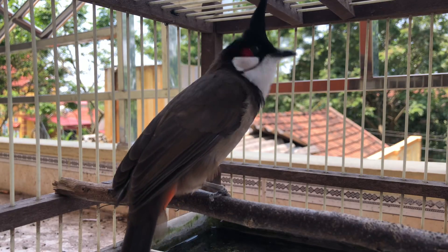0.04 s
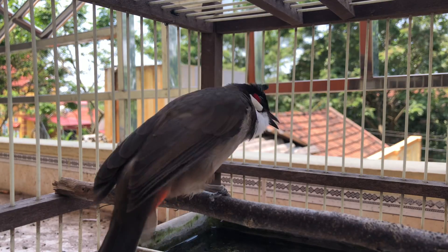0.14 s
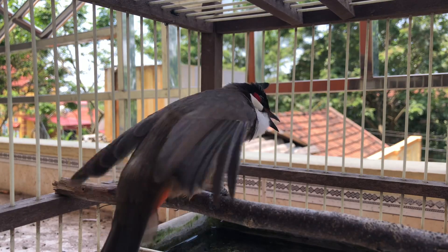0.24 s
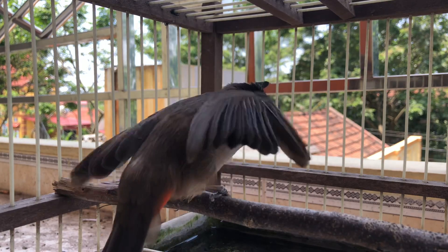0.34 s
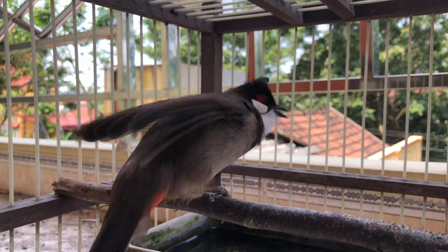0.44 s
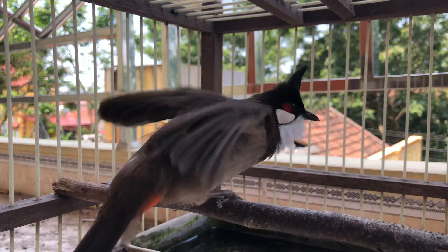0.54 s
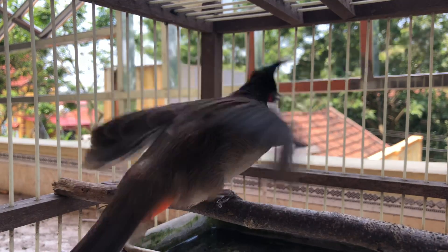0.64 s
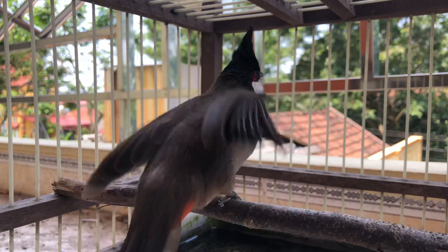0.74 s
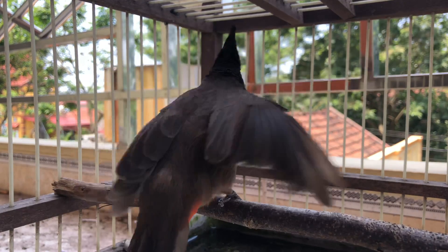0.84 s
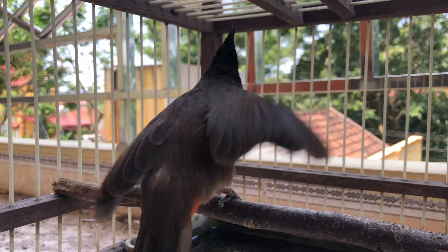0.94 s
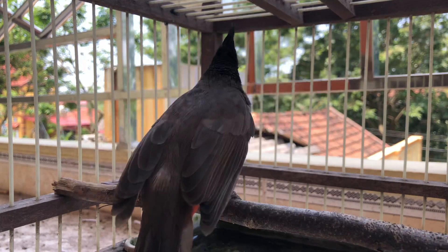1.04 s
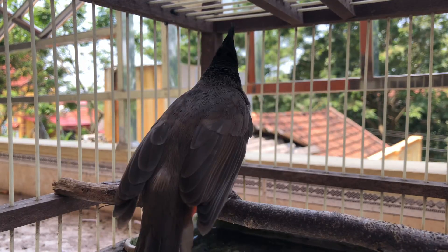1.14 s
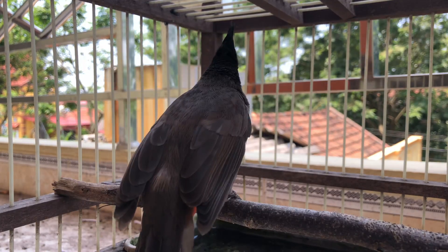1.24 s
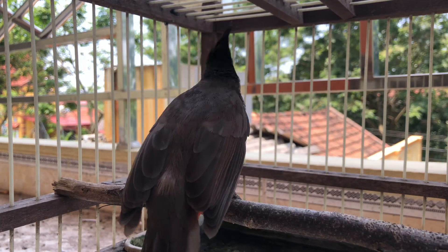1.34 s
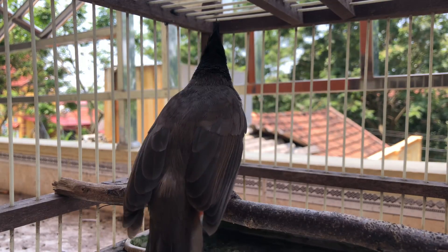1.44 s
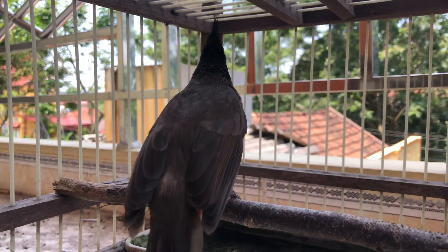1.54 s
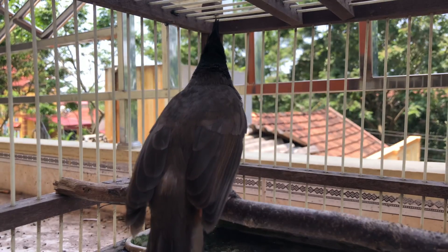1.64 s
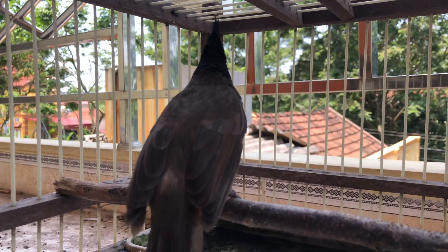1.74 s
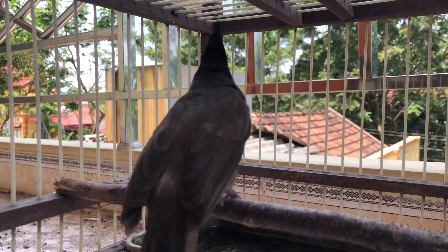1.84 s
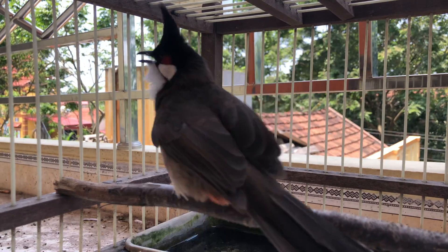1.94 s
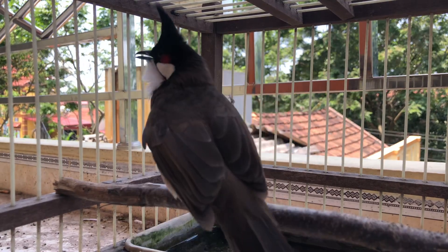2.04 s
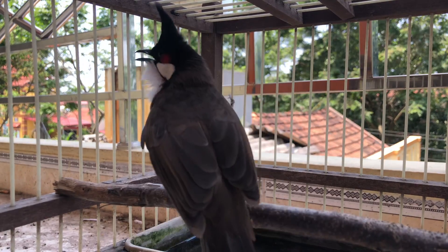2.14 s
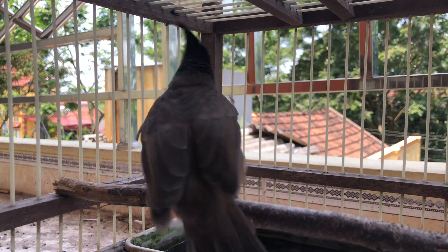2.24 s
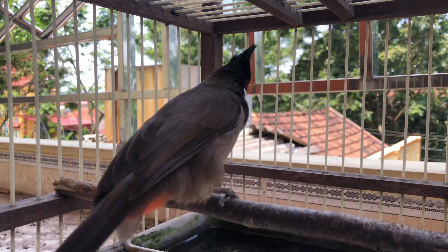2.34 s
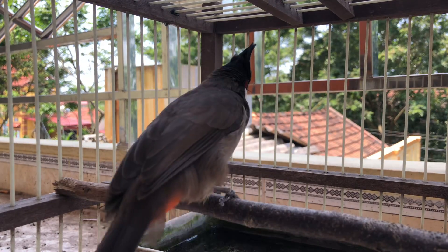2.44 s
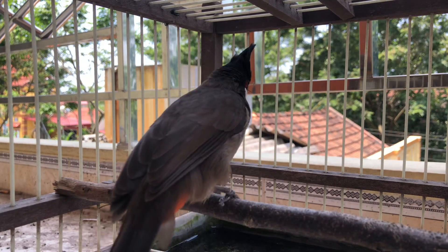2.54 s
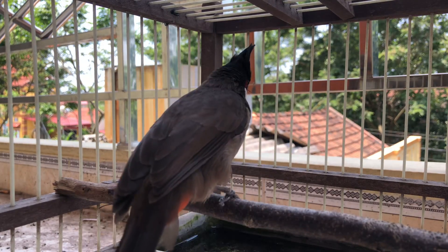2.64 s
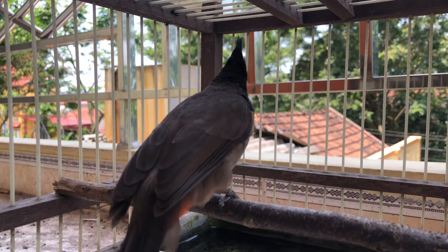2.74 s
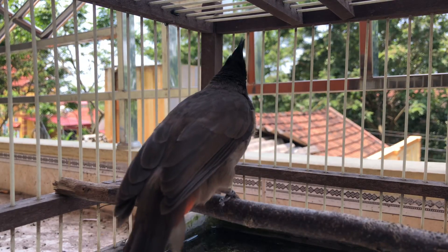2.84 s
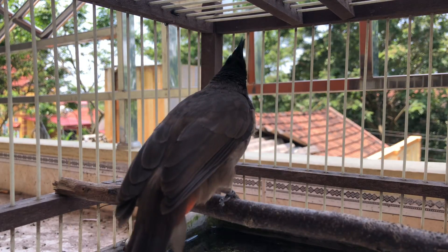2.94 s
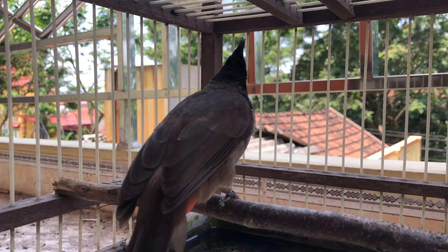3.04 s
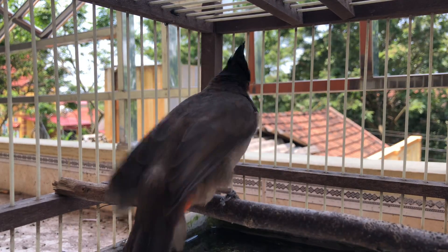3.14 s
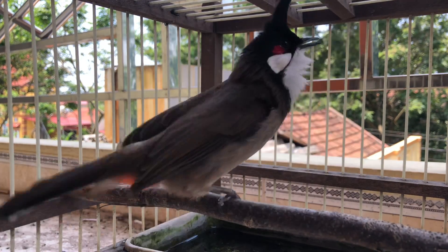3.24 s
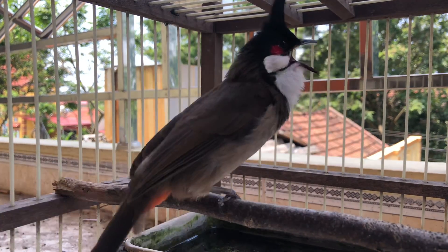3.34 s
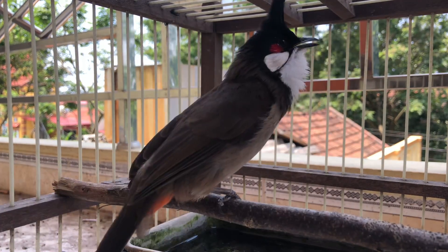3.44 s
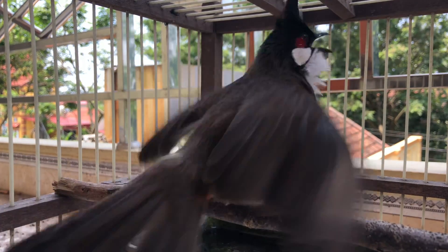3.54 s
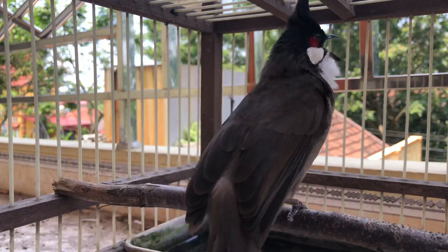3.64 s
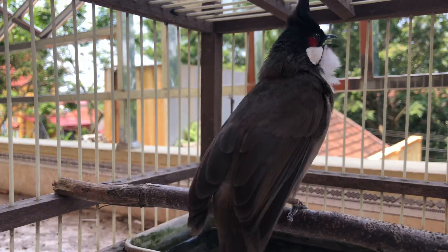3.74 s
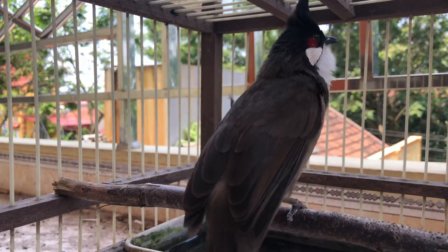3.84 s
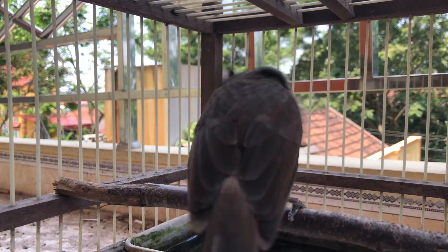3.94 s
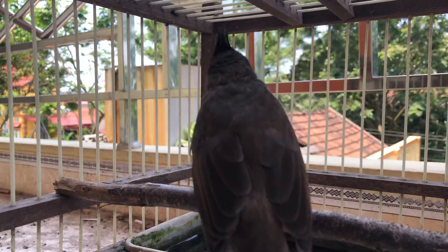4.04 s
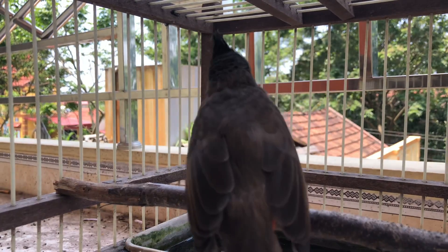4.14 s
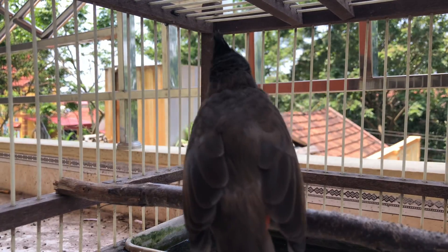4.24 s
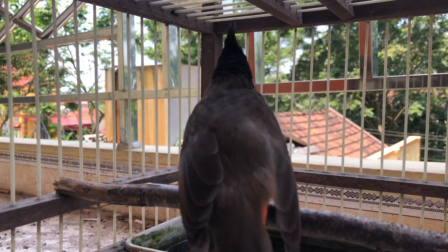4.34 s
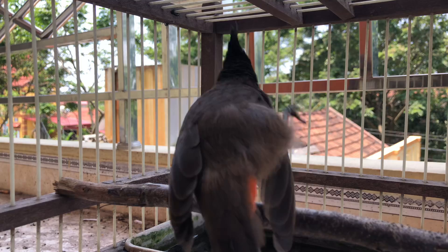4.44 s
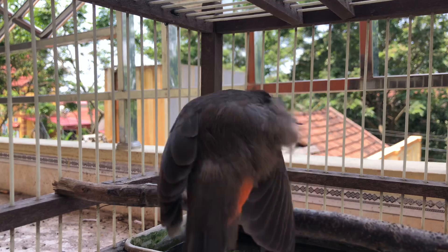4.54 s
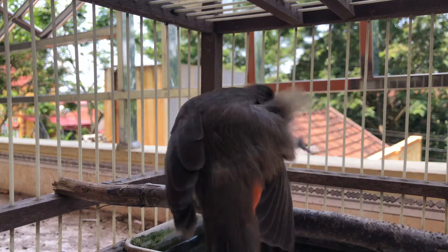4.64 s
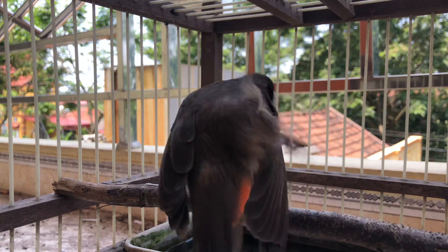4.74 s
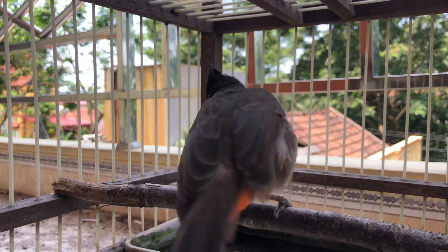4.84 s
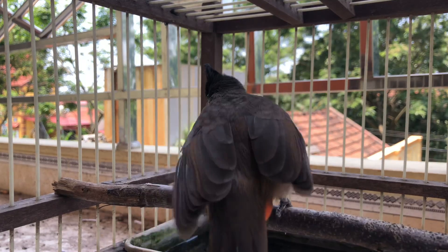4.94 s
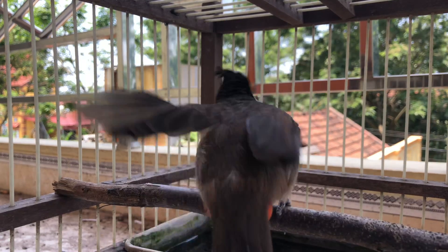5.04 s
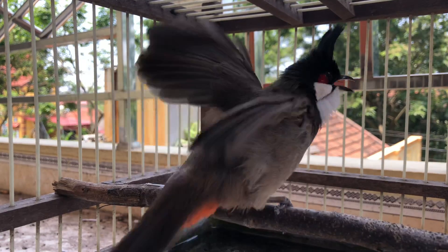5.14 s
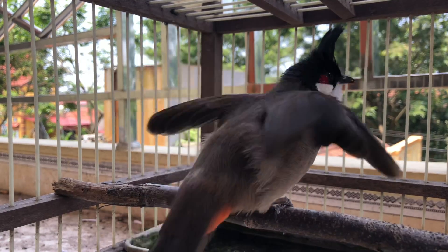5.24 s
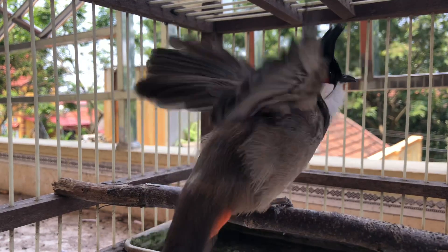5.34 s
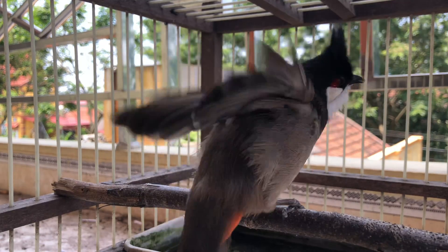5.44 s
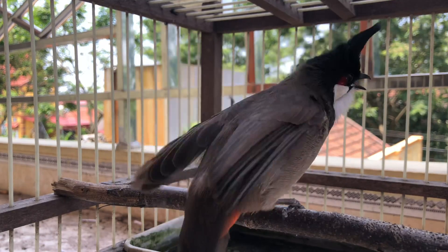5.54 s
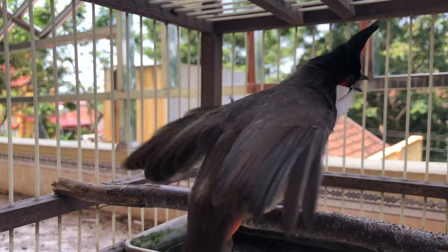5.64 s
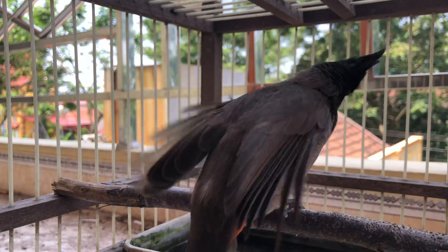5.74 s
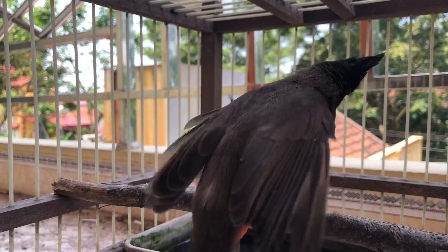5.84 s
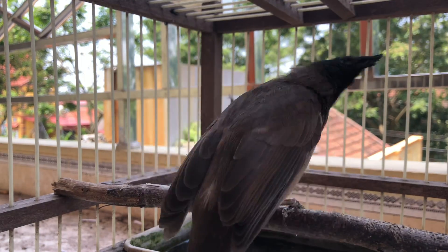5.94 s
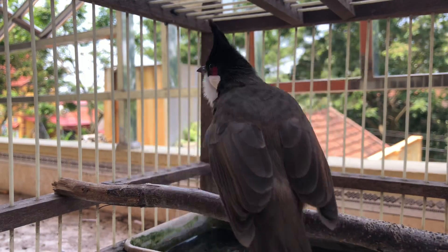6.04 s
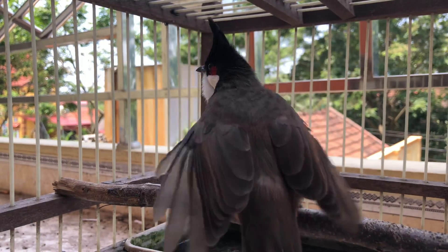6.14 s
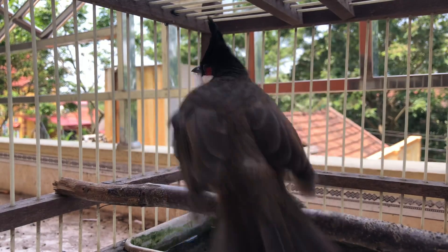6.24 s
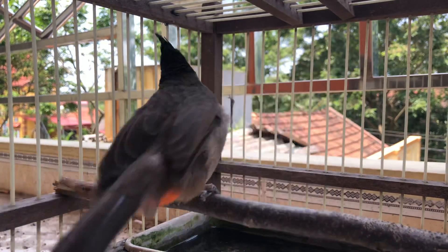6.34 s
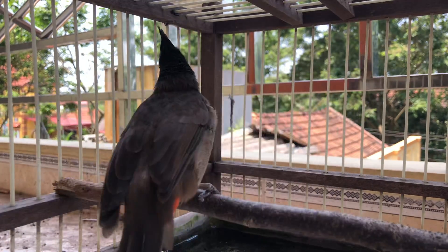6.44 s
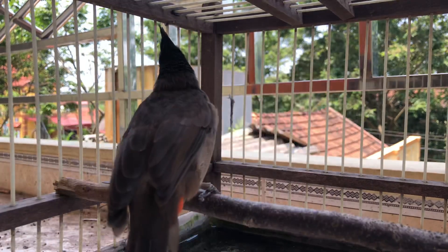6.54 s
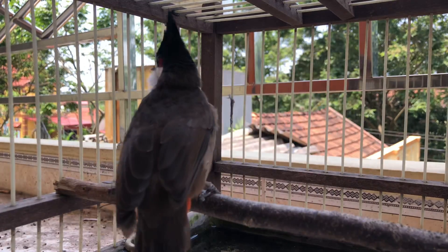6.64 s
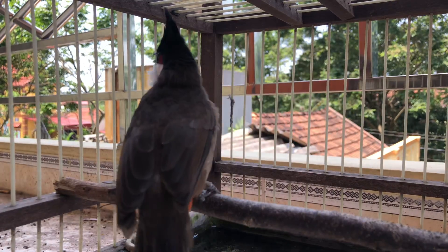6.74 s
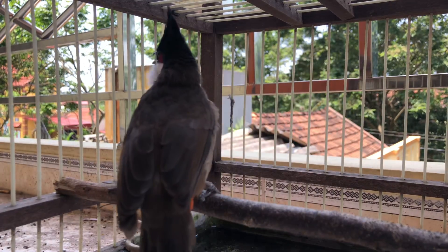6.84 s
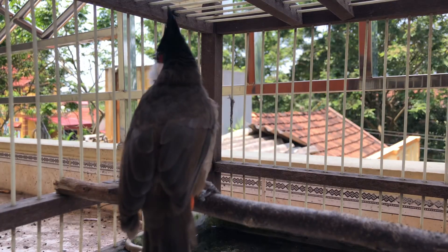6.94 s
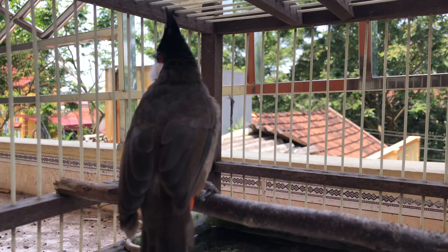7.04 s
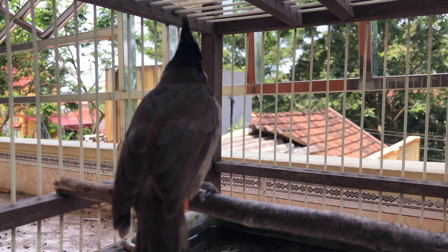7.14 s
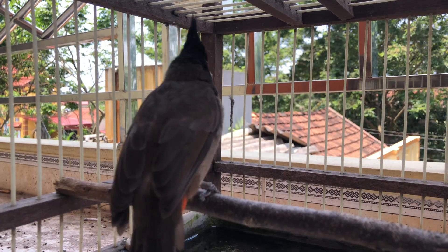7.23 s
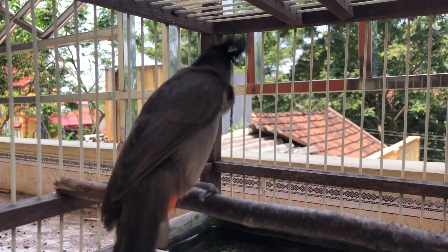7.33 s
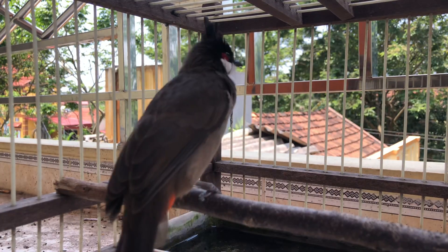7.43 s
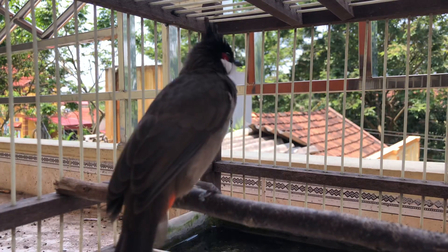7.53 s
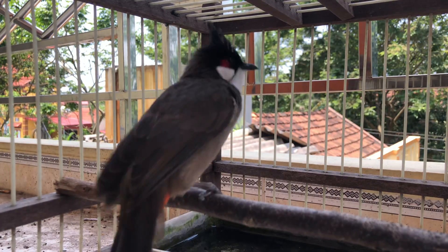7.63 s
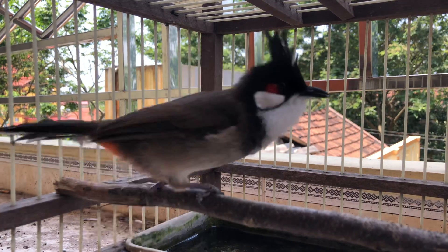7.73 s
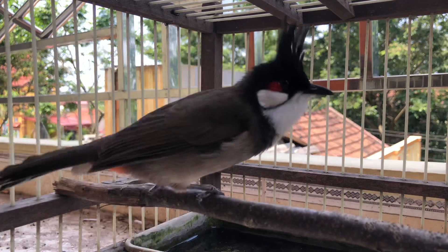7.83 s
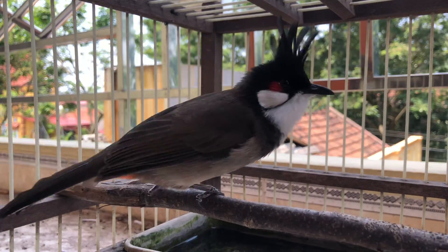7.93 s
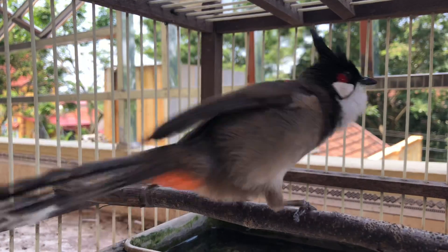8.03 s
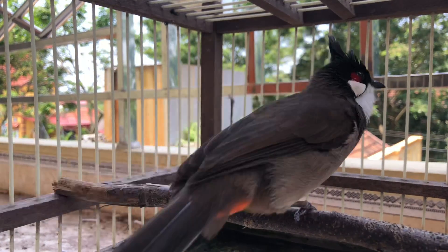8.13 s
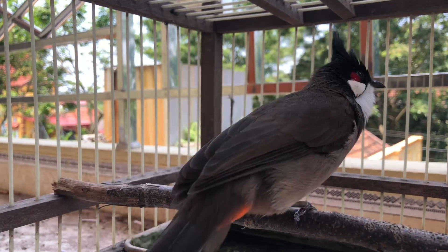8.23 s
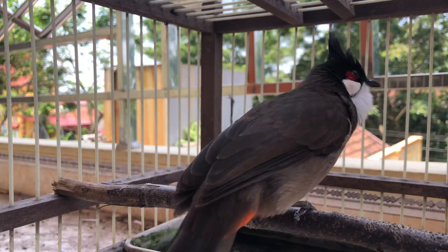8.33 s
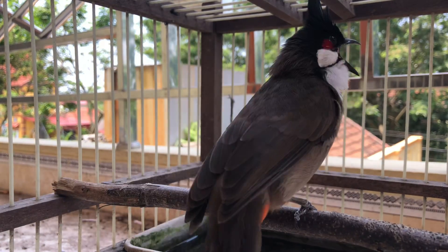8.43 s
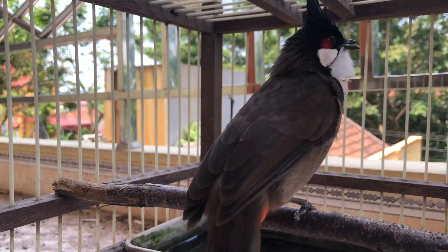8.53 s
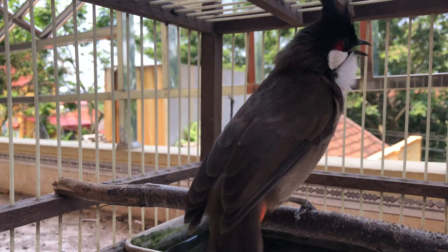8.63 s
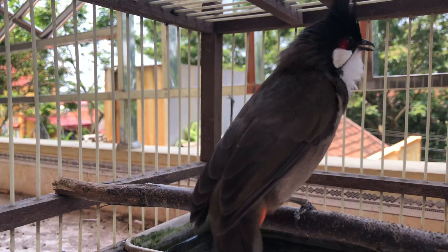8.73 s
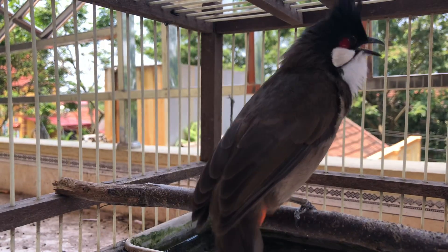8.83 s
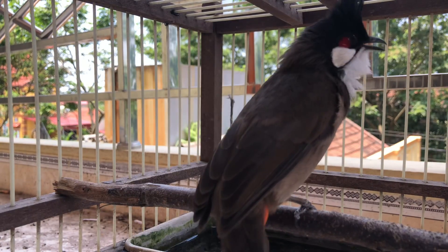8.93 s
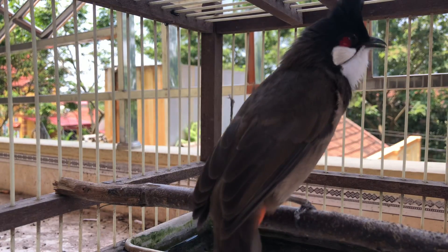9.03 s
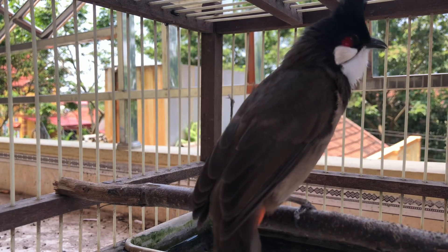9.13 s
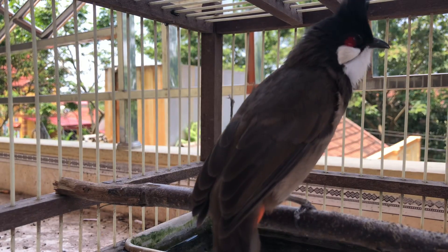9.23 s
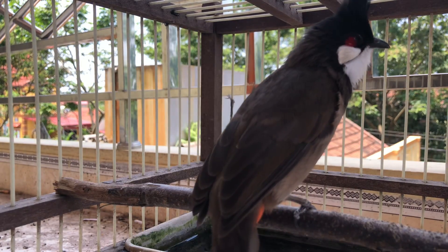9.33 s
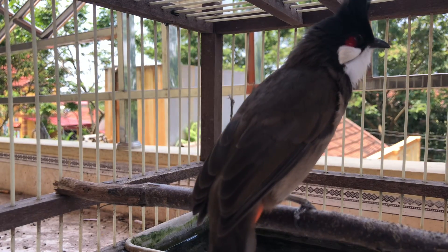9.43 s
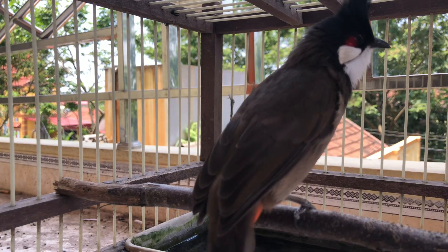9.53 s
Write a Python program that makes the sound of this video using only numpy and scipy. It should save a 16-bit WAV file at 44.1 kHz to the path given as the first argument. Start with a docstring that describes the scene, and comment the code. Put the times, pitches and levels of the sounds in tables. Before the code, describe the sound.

A caged songbird is very close to the microphone on a roofed terrace, its loud notes direct and bright with short wall reflections and a faint tail. Soft swooping and rising whistles open the first 0.7 s, then a low rattle and squeaky hook at 0.8. A quiet chip comes at 1.4, and a distant similar bird answers at 1.7. At 2.0-2.3 a loud buzz, raspy churr and clear pipe burst out. The main phrase, rising trill, stepped whistle, breaking leap, falling warble, rings at 3.3-3.8, 6.4-7.0 and 8.4-9.0. Between are soft raspy chips, feather puffs and a quieter scold, warble and swoop around 5.1-5.9. Another faint reply overlaps 6.3-6.6. Dull perch thuds cluster at 7.1-7.5. A thin flickering machine whine fades by 2.1; low hum, soft town rumble and faint far chirrs and hoots remain.

```python
"""Caged bulbul on a roofed terrace

A bulbul sings close to a phone: sine notes with trills, rough partials and breath, plus chips and noise-puff rustle.
Early copies and a long noise tail answer from the walls; a neighbour bird replies and far birds chirr and hoot faintly.
A machine whines and hums as gliding sines over patchy town noise, and the perch thuds as decaying wood modes.
The loudest notes push the recorder's limiter."""
import sys
import numpy as np
from scipy import signal
from scipy.fft import rfft, irfft, next_fast_len
from scipy.io import wavfile
from scipy.ndimage import uniform_filter1d, minimum_filter1d, map_coordinates

SR = 44100
rng = np.random.default_rng(int(sys.argv[2]) if len(sys.argv) > 2 else 0)


def volts_from_decibels(level):
    """Turn decibel levels (scalar or array-like) into linear amplitude factors."""
    exponent = np.asarray(level, float) / 20
    return 10 ** exponent


def unload_audio(sound):
    """Save the sound as a 16-bit wav file, at the path given as the first command line argument."""
    columns = np.transpose(np.atleast_2d(sound))
    # keep every value between -1 and 1, then stretch to whole-number steps
    steps = np.round(np.clip(columns, -1, 1) * 32767)
    wavfile.write(sys.argv[1], SR, steps.astype(np.int16))


N = 422478


def unit(x):
    """Scale to rms 1."""
    return x / np.sqrt(np.mean(x ** 2) + 1e-20)


def along(points, hz):
    """Read a (frequency, value) curve on a log frequency axis."""
    f, v = np.transpose(points)
    return np.interp(np.log(hz + 1), np.log(f + 1), v)


def wobble(count, rate_hz):
    """A smooth random curve through rate_hz random points a second."""
    points = rng.standard_normal(int(count * rate_hz / SR) + 4)
    return map_coordinates(points, [np.arange(count) * rate_hz / SR])


def coloured(x, points):
    """Equalise x with a (frequency [Hz], gain [dB]) curve."""
    m = next_fast_len(len(x) + 8192)
    gain = volts_from_decibels(along(points, np.fft.rfftfreq(m, 1 / SR)))
    return irfft(rfft(x, m) * gain, m)[:len(x)]


def add(track, s, sound):
    """Mix a sound in at time s."""
    part = track[round(s * SR):][:len(sound)]
    part += sound[:len(part)]


# overall tilt of the town noise: (frequency [Hz], relative level [dB])
TOWN_COLOUR = [(12, -35), (20, 2), (107, -0.5), (554, -20), (1180, -22.5), (1690, -16), (2060, -26),
               (2720, -20.5), (4250, -30.5), (5030, -30), (8080, -39.5), (10800, -46), (12600, -51.5),
               (15800, -46)]
# rumble swell, used relative to its mean: (time [s], level [dB])
RUMBLE_SWELL = [(0.0, -56), (0.4, -60.5), (1.15, -57.5), (2.11, -58), (3.07, -55), (3.28, -61),
                (5.12, -57.5), (8.3, -57.5), (8.7, -61), (9.58, -62)]
# treble hiss swell: (time [s], relative level [dB])
HISS_SWELL = [(0, 5.5), (1.2, 4.5), (2.7, 0), (4.5, 6), (6., 2), (7.5, 3.5), (9.58, -7.5)]


def town():
    """Patchy noise from a random time-frequency field; rumble and hiss swell on their own, the middle stays."""
    hz, t, z = signal.stft(rng.standard_normal(N), SR, nperseg=1024)
    patches = rng.standard_normal(z.shape)
    patches = unit(uniform_filter1d(uniform_filter1d(patches, 5, 0), 6, 1))
    s, rumble_db = np.transpose(RUMBLE_SWELL)
    low = np.clip(2 - hz / 400, 0, 1)[:, None]
    high = np.clip(hz / 2500 - 1.5, 0, 1)[:, None]
    gusts = 1.2 * wobble(N, rate_hz=3)[np.minimum(np.round(t * SR).astype(int), N - 1)]
    rumble = np.interp(t, s, rumble_db - rumble_db.mean()) + gusts
    swell = low * rumble + high * np.interp(t, *np.transpose(HISS_SWELL))
    noise = signal.istft(z * volts_from_decibels(0.88 * patches + swell), SR, nperseg=1024)[1][:N]
    return volts_from_decibels(-52.5) * unit(coloured(noise, TOWN_COLOUR))


# machine whine before its flicker: (time [s], pitch [Hz], rms level [dB], octave rms level [dB])
WHINE_GLIDE = [(0, 721, -63, -60.5), (.24, 729, -59, -72), (0.301, 746, -58.5, -55.5),
               (.55, 719, -45.5, -54.5), (.66, 708, -61, -58), (.85, 729, -59.5, -63), (.92, 732, -61, -47),
               (2.07, 729, -72, -51.5), (2.15, 744, -91, -66.5)]


def whine():
    """A gliding machine tone and its octave, each flickering in level on its own."""
    s, hz, db, octave_db = np.transpose(WHINE_GLIDE)
    t = np.arange(0, s[-1], 1 / SR)
    phase = 2 * np.pi * np.cumsum(np.interp(t, s, hz)) / SR
    low = volts_from_decibels(np.interp(t, s, db) + 2.5 * wobble(len(t), rate_hz=18)) * np.sin(phase)
    high = volts_from_decibels(np.interp(t, s, octave_db) + 2.6 * wobble(len(t), rate_hz=36)) * np.sin(2 * phase)
    return np.sqrt(2) * np.pad(low + high, (0, N - len(t)))


# low hum: (centre pitch [Hz], centre rms level [dB], level waver [dB])
HUM_TONE = (100.5, -62, 4)


def hum():
    """A low sine that wavers in level and pitch."""
    hz, db, waver_db = HUM_TONE
    phase = 2 * np.pi * np.cumsum(hz * (1 + 0.018 * wobble(N, rate_hz=14))) / SR
    return np.sqrt(2) * volts_from_decibels(db + waver_db * wobble(N, rate_hz=4)) * np.sin(phase)


# faint far hoots: (time [s], length [s], centre pitch [Hz], level before waver [dB])
FAR_HOOTS = [(0.038, 0.074, 903, -49.5), (4.94, 0.11, 516, -59), (5.797, 0.22, 962, -60.5),
             (5.81, 0.16, 619, -62), (6.438, 0.13, 946, -61), (8.999, 0.13, 623, -63.5),
             (9.274, 0.27, 644.6, -53.5)]


def hoots():
    """Soft far-off sines with an octave, wavering in pitch and level."""
    out = np.zeros(N)
    for s, length, hz, db in FAR_HOOTS:
        count = round(length * SR)
        phase = 2 * np.pi * np.cumsum(hz * (1 + .01 * wobble(count, rate_hz=15))) / SR
        level = volts_from_decibels(db + 2.8 * wobble(count, rate_hz=41)) * np.hanning(count) ** .5
        add(out, s, level * (np.sin(phase) + .5 * np.sin(2 * phase)))
    return out


# the throat passes only overtones that lie low: (overtone frequency [Hz], relative level [dB])
THROAT = [(2000, 6.5), (2800, -11), (3300, -16.5), (3800, -26), (4600, -31.5), (6000, -32), (8000, -36.5)]
# weak rough partials: (multiple of the pitch, level before effort and flutter [dB])
ROUGH_PARTIALS = [(.5, -50.5), (1.5, -54.5), (2.5, -53.5), (3, -44.5), (3.5, -57.5), (4, -52.5), (4.5, -52),
                  (5, -39), (5.5, -55.5), (6, -36)]
# air hissing through the beak: (frequency [Hz], relative level [dB])
BEAK_AIR = [(500, -39), (2500, -1.5), (7000, 0.5), (9000, -4.5), (11000, 0.5), (14000, -1)]
# the voice's treble, which changes as the head turns: (time [s], gain [dB])
HEAD_TURN = [(.6, -1), (2, -2), (3.3, 2.5), (3.7, -1.5), (5.2, 0), (6.4, -1), (6.8, -3), (8.4, 3.5),
             (8.9, 0.5)]


def syrinx(rows, trill=(190, .1, 0, 0), close_db=-32., throat_db=0., slope_db=6.5,
           uneven=.06, rasp_db=-21.0, breath_db=-44.0):
    """One note: a sine with weak rough partials; the membrane slackens at the end and the pitch drops away.

    trill = (swings a second [Hz], pitch swing, double-beat share at start, at end; shares clip to 0-1)."""
    rows = np.array(rows, float)
    s, hz, db = rows.T[:3]
    end, faint = s[-1], min(db[-1], db.max() + close_db)
    t = np.arange(s[0] - .003, end + .012, 1 / SR)
    knots = np.r_[t[0], s, end + .002, end + .008, end + .012]
    pitch = np.interp(t, knots, np.r_[hz[0], hz, .8 * hz[-1], 1050, 850])
    pitch = uniform_filter1d(pitch, size=50)
    level_db = np.interp(t, knots, np.r_[db[0] - 20, db, faint, faint - 5, faint - 24])
    level = volts_from_decibels(uniform_filter1d(level_db, size=50))
    depth = np.interp(t, s, np.clip(rows[:, 3], 0, 1)) if rows.shape[1] > 3 else 0 * t
    # the trill swings the pitch unevenly; loudness beats once or twice a swing
    trill_hz, swing, *twice = trill
    twice = np.clip(np.interp(t, s[[0, -1]], twice), 0, 1)
    swings = np.cumsum(trill_hz * (1 + uneven * wobble(len(t), rate_hz=60))) / SR
    beat = 2 * np.pi * (swings + rng.random())
    level = level * (1 + depth * ((1 - twice) * np.cos(beat + 2.0) + twice * np.cos(2 * beat + 1.8)))
    level = level * (1 + depth * volts_from_decibels(rasp_db) * wobble(len(t), rate_hz=1500))
    jitter = 0.0085 * wobble(len(t), rate_hz=310)
    phase = 2 * np.pi * np.cumsum(pitch * (1 + swing * depth * np.cos(beat) + jitter)) / SR
    tone = np.sin(phase)
    for k in range(2, 5):
        overtone_db = along(THROAT, k * pitch) + throat_db - slope_db * (k - 2.5)
        tone += volts_from_decibels(overtone_db) * np.sin(k * phase)
    # harder singing brings out the treble
    effort = np.clip(level / .35, 0, 1) ** .8 * volts_from_decibels(np.interp(s[0], *np.transpose(HEAD_TURN)))
    for k, part_db in ROUGH_PARTIALS:
        flutter = 1.3 + (.5 + 0.55 * depth) * wobble(len(t), rate_hz=470)
        tone += volts_from_decibels(part_db) * effort * flutter * np.sin(k * phase) * (k * pitch < SR / 2)
    breath = coloured(rng.standard_normal(len(t)), BEAK_AIR)
    tone += volts_from_decibels(breath_db + 9 * depth) * effort * breath
    return t[0], np.sqrt(2) * level * tone


def sing(track, shape, s=0, db=0, factor=1, stretch=1, depth=1, **voice):
    """One syllable at time s, scaled in level, pitch, length and trill depth."""
    shape = np.array(shape, float)
    width = shape.shape[1]
    rows = shape * [stretch, factor, 1, depth][:width] + [s, 0, db, 0][:width]
    add(track, *syrinx(rows, **voice))


# soft whistles, here and in the next two: (time [s], pitch [Hz], level [dB])
SOFT_SWOOPS = [
    [(0.088, 3130, -53.5), (0.098, 3290, -41.5), (0.12, 4575, -54), (0.134, 4810, -49), (0.16, 4567, -57),
     (0.18, 4018, -35), (0.2, 3783, -37), (0.22, 3793, -33), (0.26, 4203, -26.5), (0.278, 4416, -36.5),
     (0.324, 4960, -38), (0.344, 5725, -52.5), (0.374, 6285, -48), (0.404, 6195, -48), (0.424, 5695, -58)],
    [(5.535, 4920, -63.5), (5.551, 5546, -54.5), (5.569, 5555, -49), (5.581, 4775, -57.5),
     (5.597, 3803, -37), (5.607, 3640, -38), (5.657, 4020, -32.5), (5.677, 4176, -47.5),
     (5.699, 4534, -33.5), (5.737, 4840, -46), (5.751, 5400, -44.5), (5.781, 6080, -44.5),
     (5.831, 6200, -49), (5.845, 5860, -47), (5.858, 4490, -65.5)],
]
SOFT_GLIDE = [(0.54, 1120, -53), (0.546, 1120, -31), (0.556, 1380, -28), (0.592, 1544, -24),
              (0.618, 2080, -31.5), (0.632, 2247, -21.5), (0.664, 2612, -23.5), (0.686, 2692, -24),
              (0.697, 2530, -30)]
SOFT_WARBLE = [(5.3, 953, -48.5), (5.31, 1172, -34), (5.313, 2040, -27), (5.326, 2105, -25),
               (5.33, 1320, -30), (5.345, 1161, -32.5), (5.362, 1046, -55), (5.385, 1884, -28.5),
               (5.396, 1912, -28), (5.401, 1555, -25.5), (5.414, 1467, -30), (5.419, 2408, -22.5),
               (5.426, 1810, -28), (5.432, 2365, -25), (5.439, 1830, -41)]
# a swoop ends in a flick downward: (time after the end [s], pitch [Hz], level [dB])
SWOOP_FLICK = (.003, 4000, -37.5)


def soft_whistles(out):
    """Quiet untrilled notes: two swoops, a breathy rising glide with a weak octave and a leaping warble."""
    for shape in SOFT_SWOOPS:
        flick = (shape[-1][0] + SWOOP_FLICK[0], *SWOOP_FLICK[1:])
        sing(out, shape + [flick], close_db=-13, throat_db=-3.0)
    sing(out, SOFT_GLIDE, close_db=-14.5, throat_db=-9, slope_db=-7, breath_db=-30)
    sing(out, SOFT_WARBLE, close_db=-49.0, throat_db=0.5)


# scold shapes before scaling: (time from start [s], pitch [Hz], relative level [dB], trill depth [0-1]);
# the hook has no trill column. Each one's times:
# (time [s], level offset [dB], pitch factor, length factor, trill depth factor)
LOW_RATTLE = [(0, 2354, -35, 0.92), (.008, 2360, -22, .7), (.022, 2450, -23, .7), (.033, 2480, -21.5, .7),
              (.043, 2347, -37.5, .8)]
RATTLE_TIMES = [(.788, 1.5, 1.02, .98, .9), (5.115, -2.4, 0.96, 1.03, 1.1)]
UP_HOOK = [(0, 2137, -31), (.021, 2018, -26.5), (.026, 3562, -22), (.032, 3790, -25.5), (.042, 3850, -21.5),
           (.051, 3470, -43)]
HOOK_TIMES = [(.835, 3, .99, 1.02, 0), (5.17, -1, 1.01, 0.88, 0)]
HARSH_SQUEAK = [(0, 3885, -37.5, 0.72), (.011, 4078, -18, 0.9), (.017, 4040, -23, .55)]
SQUEAK_TIMES = [(.843, -4, 1.03, .98, .9), (5.174, 3, .95, 1.04, .9)]


def scold(out):
    """A low rattle, then a hook upward under a harsh squeak from the second side of the syrinx."""
    for row in RATTLE_TIMES:
        sing(out, LOW_RATTLE, *row, trill=(120, .15, .35, .25), close_db=-40, throat_db=-8,
             uneven=.15, rasp_db=-6, breath_db=-34)
    for row in HOOK_TIMES:
        sing(out, UP_HOOK, *row, close_db=-42, throat_db=-14)
    for row in SQUEAK_TIMES:
        sing(out, HARSH_SQUEAK, *row, trill=(330, .06, 0, 0), close_db=-40, rasp_db=-8, breath_db=-30)


# chip shape before scaling: (time from start [s], pitch [Hz], relative level [dB], trill depth [0-1])
CHIP_SHAPE = [(-0.006, 1198, -15.5, 0.4), (-0.003, 1499, -7.5, 0.6), (-0.001, 1827, -6, 0.5),
              (0.007, 1850, -3, .25), (0.009, 1519, -4, 0.4), (0.014, 1363, -1.06, 0),
              (0.021, 1760, -0.2, .25), (0.035, 1531, -12.5, 0), (0.037, 1465, -9, 0)]
# chips: (time [s], level offset [dB], pitch factor, length factor, throat overtone gain [dB])
CHIP_TIMES = [(1.3757, -29, 0.94, 1.05, 1), (2.7012, -25, 1, 1.05, -4), (2.9503, -48.5, 0.93, 1.05, 9.5),
              (4.126, -31, 0.94, 1.05, 3), (4.3193, -30, 0.95, 1.05, -0.5), (4.6173, -31, 1, 0.85, 6.5),
              (4.8542, -28.5, 0.96, 1.05, 1), (6.098, -34.5, 0.98, 0.96, 8), (7.7464, -26, 1, 1.05, 3),
              (8.0573, -27.5, 0.97, 1.05, -1.5)]


def chips(out):
    """Short soft raspy calls, each with its own balance of overtones."""
    for s, db, factor, stretch, throat_db in CHIP_TIMES:
        sing(out, CHIP_SHAPE, s, db, factor, stretch, depth=.6, rasp_db=-10,
             throat_db=throat_db, close_db=-26.5, breath_db=-30)


# notes sung once, here and in the next two: (time [s], pitch [Hz], level [dB], trill depth [0-1])
BUZZ_NOTE = [(1.988, 3640, -18, 0.24), (1.997, 3520, -16, 0.32), (2.001, 3497, 3, 0.23),
             (2.027, 3446, -17.5, 0.1), (2.034, 3245, -11.5, 0.1)]
CHURR_NOTE = [(2.112, 2085, -35.5, .7), (2.12, 2219, -18, .8), (2.139, 2553, -6.5, 0.46),
              (2.163, 2499, -12, 1), (2.189, 2604, -8.5, 0.56), (2.2, 2713, -18.5, 0.55)]
PIPE_NOTE = [(2.2, 2860, -15.5, .3), (2.212, 3140, -6, 0.37), (2.224, 3357, -15, .7), (2.24, 3420, -12, .7),
             (2.249, 2985, -19.5, 0.081), (2.256, 3077, -4.5, 0.0083), (2.266, 3064, -4.5, .01),
             (2.284, 3070, -15.5, .01), (2.288, 3170, -25, 0.0088)]


def single_call(out):
    """A buzz with fast wide swings, an uneven raspy churr and a slower-trilled pipe."""
    sing(out, BUZZ_NOTE, trill=(278.5, 0.38, -5.5, -1.7), close_db=-34.0)
    sing(out, CHURR_NOTE, trill=(110, 0.088, 1.8, 2.0), close_db=-45.5, uneven=0.24,
         throat_db=-2.5, rasp_db=-16.5)
    sing(out, PIPE_NOTE, trill=(57, 0.063, 0.37, 0.46), close_db=-44, uneven=0.14, throat_db=-6)


# song shapes before scaling: (time from start [s], pitch [Hz], relative level [dB], trill depth [0-1]);
# the leap has no trill column. Each one's times:
# (time [s], level offset [dB], pitch factor, length factor, trill depth factor)
RISING_TRILL = [(0, 1440, -41, .8), (.008, 2000, -36, .84), (.014, 2250, -19, .7), (.022, 2500, -14, .85),
                (.031, 2850, -10.5, .9), (.047, 3130, -9.5, .9), (.07, 3400, -8.5, .9), (.09, 3510, -8, .6),
                (.104, 3560, -7.5, .25), (.114, 3570, -14, .3)]
RISE_TIMES = [(3.266, 0.56, 0.98, 1.012, 0.71), (6.397, -1, 1.03, 0.94, 0.61),
              (8.392, 0.94, 0.98, 1.04, 0.76)]
STEP_WHISTLE = [(0, 2798, -30, .5), (.004, 2554, -10.5, .5), (.007, 2211, -14.5, .5),
                (.015, 2135, -13.5, .3), (.026, 2303, -4, .05), (.036, 2294, -6.5, .05),
                (.039, 2730, -13.5, .02), (.048, 2746, -1.5, .01), (.073, 2785, -6, .01),
                (.083, 2728, -20, .01)]
STEP_TIMES = [(3.509, 0.065, 1.003, .99, .6), (6.622, .1, 1.01, 1.01, .9),
              (8.646, -0.39, 1.005, 1.01, 0.87)]
BREAKING_LEAP = [(0, 1307, -32), (.006, 1555, -18.5), (.018, 2002, -9), (.025, 1813, -16.5),
                 (.027, 2788, -4), (.03, 3328, -14), (.035, 3030, -6.5), (.038, 3150, -9.5),
                 (.04, 3865, -20), (.05, 3230, -21)]
LEAP_TIMES = [(3.636, -0.4, .995, .98, 0), (6.752, -1, 1.01, 1.02, 0), (8.776, -0.46, 1.005, 1.01, 0)]
FALLING_WARBLE = [(0, 2877, -31, 0.13), (.003, 3170, -11.5, .1), (.006, 2697, -13, .1),
                  (.012, 2852, -10, 0.25), (.022, 2826, -11, .1), (.025, 2314, -12.5, .05),
                  (.033, 2500, -4.5, .05), (.05, 2381, -7, 0.11), (.09, 2120, -8, .55),
                  (.11, 2088, -18.5, .7)]
FALL_TIMES = [(3.727, -0.25, 1, 1.01, 0.56), (6.845, 0.35, 1.007, 1.02, .9),
              (8.873, -0.0085, .995, 0.91, 0.64)]


def song(out):
    """A rising trill, a whistle that steps up, a leap that breaks and a falling warble."""
    for row in RISE_TIMES:
        sing(out, RISING_TRILL, *row, trill=(184, .095, -.9, 1.7), close_db=-35.5, throat_db=-4,
             uneven=.04, breath_db=-47)
    for row in STEP_TIMES:
        sing(out, STEP_WHISTLE, *row, trill=(180, 0.1459, -2.5, 6.5), close_db=-36, throat_db=-12)
    for row in LEAP_TIMES:
        sing(out, BREAKING_LEAP, *row, close_db=-33, throat_db=.5, slope_db=6)
    for row in FALL_TIMES:
        sing(out, FALLING_WARBLE, *row, trill=(100, 0.017, .01, .05), close_db=-40, throat_db=-9)


def bulbul():
    """The near bird: every call is a run of syrinx notes on one track."""
    out = np.zeros(N)
    soft_whistles(out)
    scold(out)
    chips(out)
    single_call(out)
    song(out)
    return out


# feathers and claws: (time [s], length [s], relative level [dB])
RUSTLE_PUFFS = [(0.261, 0.0075, -49), (0.307, 0.026, -51.5), (.488, .01, -57.5), (0.536, .02, -49.5),
                (1.897, 0.083, -59), (3.168, 0.086, -55), (4.609, 0.029, -50), (4.702, .006, -58),
                (5.756, 0.11, -64.5), (6.25, 0.12, -53), (7.671, 0.11, -55), (7.991, 0.044, -54),
                (8.036, .05, -52.5), (2.691, 0.044, -64.5), (4.845, 0.045, -60.5), (6.093, 0.031, -58),
                (1.363, 0.036, -63.5), (5.281, 0.12, -56.5), (1.286, .035, -63.5), (3.231, 0.021, -58),
                (7.309, 0.058, -63.5), (7.723, 0.0043, -53)]
# rustle noise: (frequency [Hz], relative level [dB])
FEATHER_COLOUR = [(300, -120), (600, 9), (3000, 7), (8000, 3), (15000, -6.5)]


def rustle():
    """Grainy puffs of noise as the bird hops and flicks its wings."""
    gate = np.zeros(N)
    for s, length, db in RUSTLE_PUFFS:
        add(gate, s, volts_from_decibels(db) * np.hanning(round(length * SR) + 2) ** 0.53)
    grain = volts_from_decibels(3.5 * wobble(N, rate_hz=180))
    return gate * grain * unit(coloured(rng.standard_normal(N), FEATHER_COLOUR))


# far chirring birds, one list a call: (time [s], centre pitch [Hz], peak level before mixing [dB])
FAR_CHIRRS = [
    [(.325, 3680, -63), (.342, 3540, -57), (.36, 3420, -72)],
    [(2.8, 4310, -59.5), (2.88, 4654, -51.5), (2.95, 5084, -54), (3.2, 5200, -63.5)],
    [(4.22, 5690, -69), (4.5, 4987, -71), (4.75, 4770, -65.5), (4.9, 4680, -107)],
    [(7.12, 5498, -73), (7.4, 5890, -78), (7.9, 5980, -79.5)],
    [(9.4, 6100, -65.5), (9.46, 5810, -51.5), (9.58, 5360, -56)],
]


def chirr():
    """A tone shaken widely and fast in pitch, as from far birds."""
    out = np.zeros(N)
    for rows in FAR_CHIRRS:
        s, hz, db = np.transpose(rows)
        t = np.arange(s[0], s[-1], 1 / SR)
        pitch = np.interp(t, s, hz) * (1 + .16 * np.sin(2 * wobble(len(t), rate_hz=160)))
        add(out, s[0], volts_from_decibels(np.interp(t, s, db)) * np.sin(2 * np.pi * np.cumsum(pitch) / SR))
    return out


# the neighbour's phrase, one list a note:
# (time from start [s], pitch [Hz], relative level [dB], trill depth [0-1])
REPLY_PHRASE = [
    [(0, 3389, -41, 0.4), (.05, 3429, -32.5, .5), (.11, 3570, -50.5, 0.2)],
    [(.16, 2567, -39.5, 0.8), (.23, 2706, -25, .2), (.25, 2600, -34.5, .2)],
    [(.26, 3530, -28, 0.3), (.29, 3655, -32, 0.5)],
]
# replies: (time [s], level offset [dB])
REPLY_TIMES = [(1.69, -6.5), (6.325, -4)]


def neighbour():
    """The same kind of voice from a cage further off, trilled and with little breath."""
    out = np.zeros(N)
    for start, db in REPLY_TIMES:
        for rows in REPLY_PHRASE:
            note = np.add(rows, [start, 0, db, 0])
            add(out, *syrinx(note, trill=(190, .16, .2, .3), rasp_db=-14, close_db=-40, breath_db=-60))
    return out


# the perch thuds under the bird: (time [s], relative level [dB])
PERCH_THUDS = [(3.237, -37.5), (3.599, -38), (5.3, -46), (6.33, -40.5), (7.088, -38.5), (7.31, -36.5),
               (7.383, -36), (7.467, -35.5), (7.74, -46), (7.951, -40.5), (8.062, -39)]
# what the perch rings with: (nominal frequency [Hz], relative level [dB], t60 [s])
WOOD_MODES = [(105, 8.5, 0.067), (176, 6, .045), (280, -1.5, .035)]


def perch():
    """Each thud is a soft short swing of the wood's low modes, detuned at random."""
    out, t = np.zeros(N), np.arange(SR // 10) / SR
    for s, db in PERCH_THUDS:
        ring = np.zeros(len(t))
        for hz, level, t60 in WOOD_MODES:
            ring += volts_from_decibels(level - 60 * t / t60) * np.sin(2 * np.pi * hz * rng.uniform(.85, 1.15) * t)
        add(out, s, volts_from_decibels(db) * (1 - np.exp(-t / .004)) * ring)
    return out


# near walls: (delay [s], level before colouring [dB])
WALL_ECHOES = [(.004, -24), (.009, -17), (.017, -20), (.045, -23.5)]
# walls dip slightly from 4 to 8 kHz: (frequency [Hz], gain [dB])
WALL_COLOUR = [(3000, 0.5), (4500, -3.5), (8000, -3), (11000, 0), (15000, -2)]


def walls(x):
    """The direct sound plus a few early copies, lightly coloured."""
    copies = sum(volts_from_decibels(db) * np.pad(x, (round(s * SR), 0))[:N] for s, db in WALL_ECHOES)
    return x + coloured(copies, WALL_COLOUR)


# terrace tail: (frequency [Hz], t60 [s])
TAIL_DECAY = [(1000, 1.2), (2300, 1.53), (3500, 1.34), (6000, 0.68), (8500, 0.14), (11000, 0.11),
              (15000, 0.09)]
# colour of the terrace tail: (frequency [Hz], gain [dB])
ROOF_COLOUR = [(800, 1), (1600, -3), (3000, -1), (4300, 3.5), (7000, 3.5), (11000, 14), (15000, 3.5)]


def terrace(x, onset=0.012):
    """Diffuse answer: convolution with noise in which each frequency dies at its own speed."""
    hz, t, z = signal.stft(rng.standard_normal(2 * SR), SR, nperseg=256)
    decay = volts_from_decibels(-60 * t / along(TAIL_DECAY, hz)[:, None])
    tail = signal.istft(z * decay * (1 - np.exp(-t / onset)), SR, nperseg=256)[1]
    tail = tail / np.linalg.norm(tail[:SR])
    return coloured(signal.fftconvolve(x, tail)[:N], ROOF_COLOUR)


def scene():
    """Near bird mostly direct; the other birds feed the tail far harder."""
    near = bulbul() + rustle()
    other = coloured(neighbour(), WALL_COLOUR)
    far = chirr()
    tail = terrace(volts_from_decibels(-24) * near + volts_from_decibels(3) * other + volts_from_decibels(-1.5) * far)
    birds = walls(near) + volts_from_decibels(3.5) * other + volts_from_decibels(-3.5) * far + tail
    return (birds + whine() + hum() + hoots() + perch() + town())[None]


def band_limit(x):
    """A steep low-pass at the top of the band."""
    return signal.sosfilt(signal.butter(12, 15940, fs=SR, output="sos"), x)


# microphone colour: (frequency [Hz], gain [dB])
MIC_COLOUR = [(18, -31.5), (42, -3.5), (4000, 1), (7000, 2.5), (9200, 2), (11000, 11.5), (12800, 5),
              (14500, -4), (16000, -2.5)]


def record(dry):
    """The microphone's colour, then a limiter that ducks about a millisecond around each peak."""
    x, top = coloured(dry[0], MIC_COLOUR), .9
    gain = minimum_filter1d(top / np.maximum(np.abs(x), top), size=45)
    mix = (x * uniform_filter1d(gain, size=23))[None]
    return band_limit(mix)


dry = scene()
out = record(dry)
unload_audio(out)
```